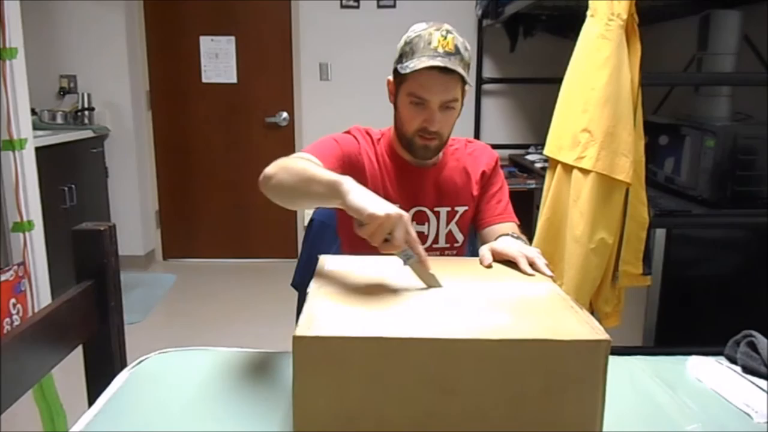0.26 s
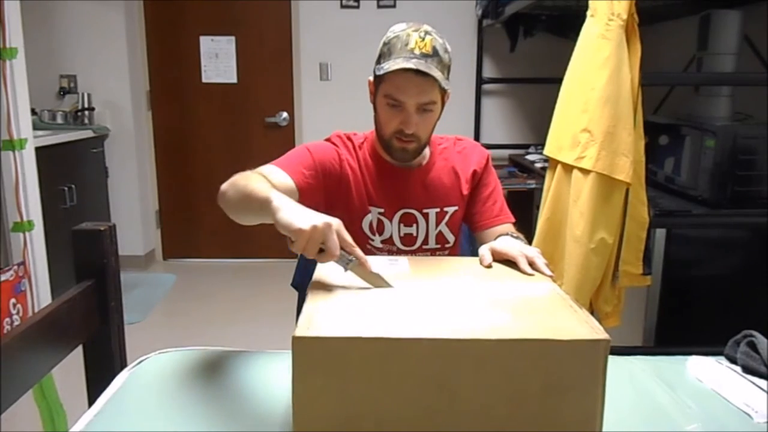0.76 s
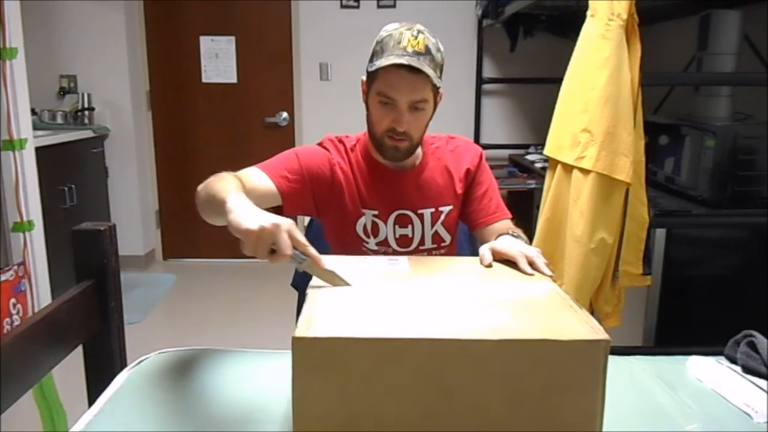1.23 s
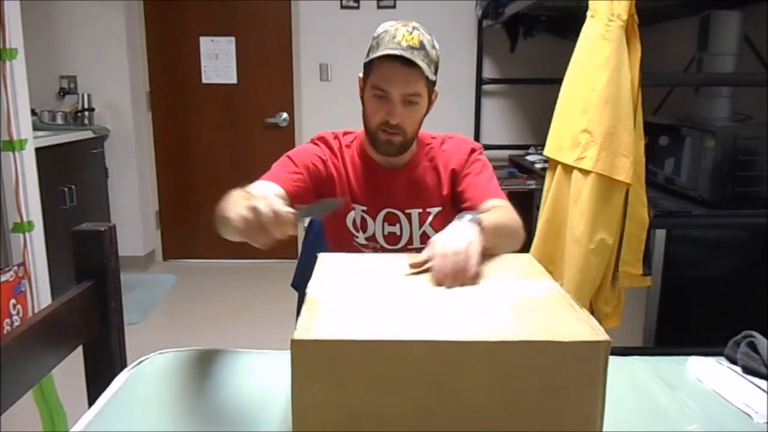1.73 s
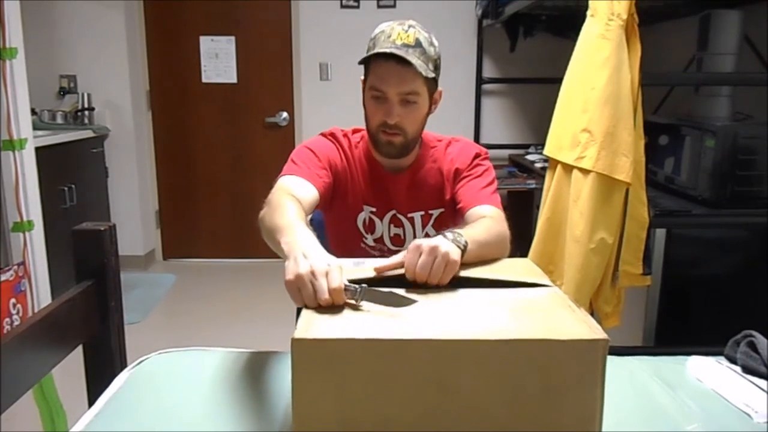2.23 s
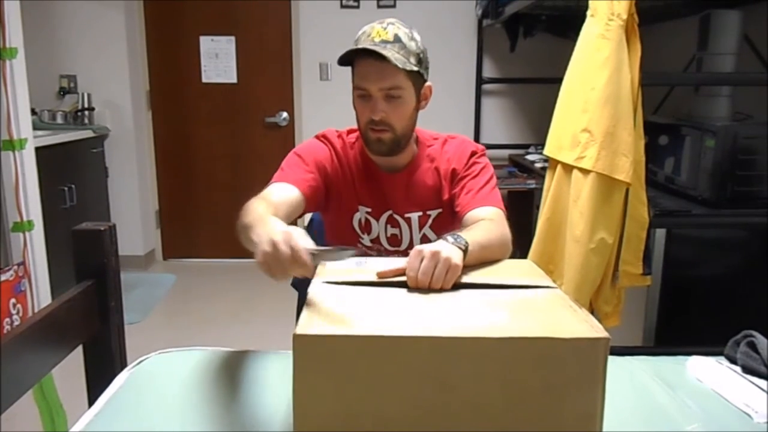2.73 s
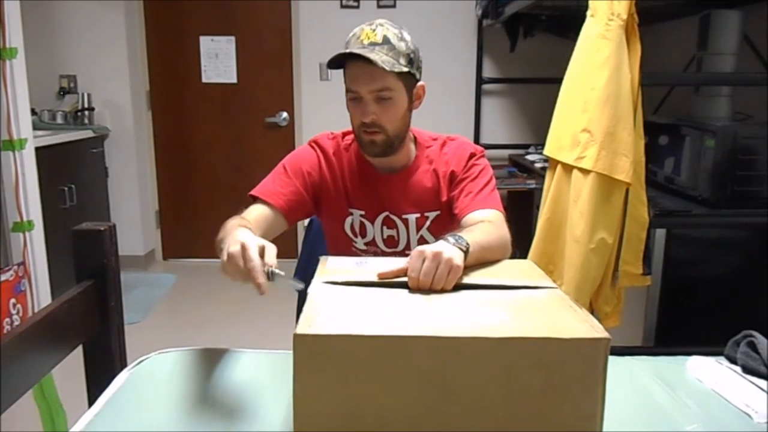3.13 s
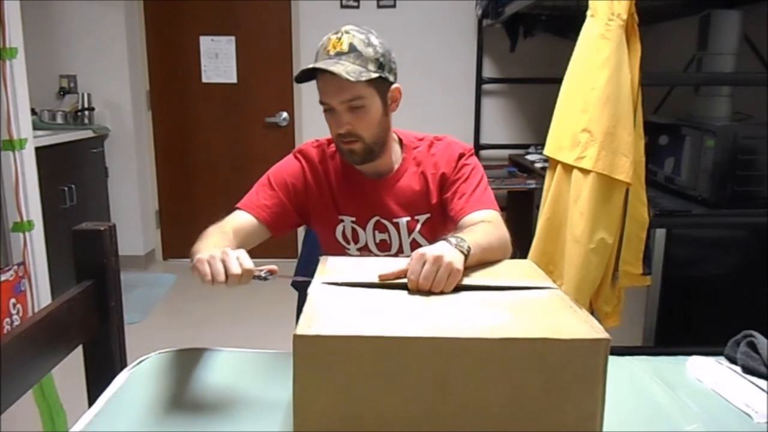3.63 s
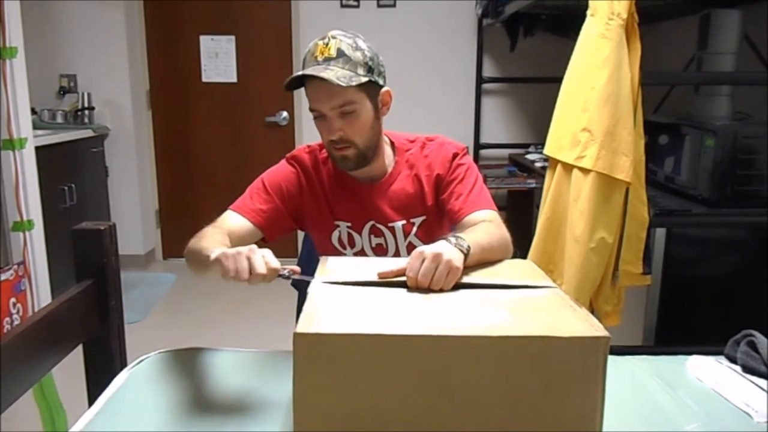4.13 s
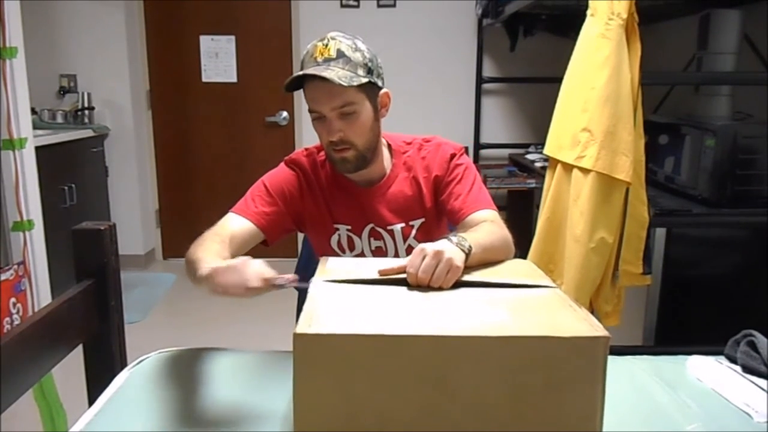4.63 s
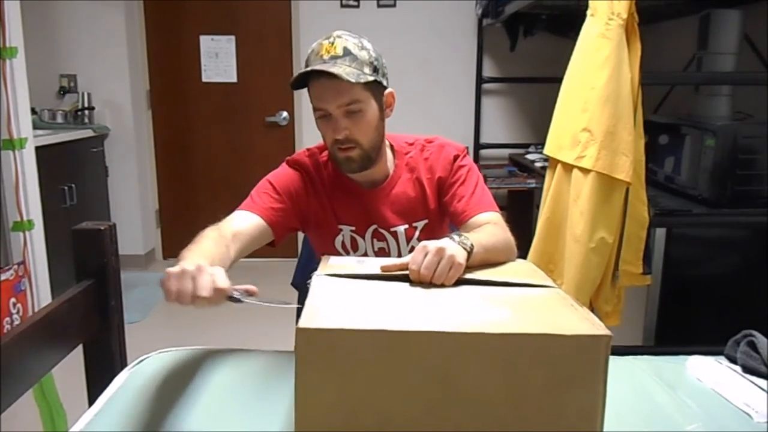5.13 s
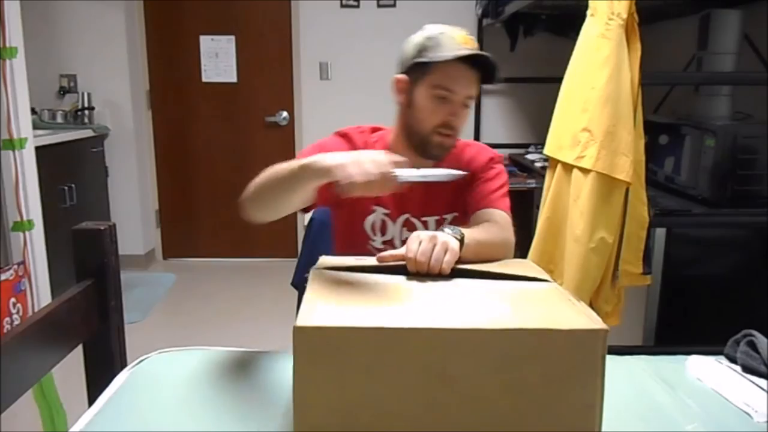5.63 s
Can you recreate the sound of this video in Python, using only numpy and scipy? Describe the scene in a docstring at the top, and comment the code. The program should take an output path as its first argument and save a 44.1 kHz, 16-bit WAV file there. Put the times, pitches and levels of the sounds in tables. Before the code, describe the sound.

Scratchy knife strokes slit packing tape on a cardboard box, broken by knocks, rips and flap clatter over steady ventilation noise.

```python
"""A knife slits the packing tape of a cardboard box on a table: the blade rasps in sticks and slips.
Taut tape snaps and rips in bursts of fractures; hands slide over the board and knock it.
Freed flaps clatter in quickening rebounds; the steel squeaks as it is pulled out of the seam.
Filtered noise makes the ventilation underneath; a small hard-walled room echoes all but that."""
import sys
import numpy as np
from scipy import signal
from scipy.fft import rfft, irfft
from scipy.io import wavfile
from scipy.ndimage import uniform_filter1d, map_coordinates

SR = 44100
rng = np.random.default_rng(int(sys.argv[2]) if len(sys.argv) > 2 else 0)


def digitize_waveform(pressure):
    """Quantize a signal to 16-bit integers and store it at the path in sys.argv[1].

    Rows of a 2-D input are taken as channels; values are limited to [-1, 1].
    """
    field = np.atleast_2d(pressure).T
    bounded = np.clip(field, -1, 1)
    quanta = np.round(bounded * 32767).astype(np.int16)
    wavfile.write(sys.argv[1], SR, quanta)


N = 258861
TIME = np.arange(N) / SR

# hands and flaps sliding on the box: peak t/s, length/s, relative board rasp/dB, relative tape hiss/dB
RUBS = [(1.895, 0.2, -26.5, -37.5), (2.035, 0.089, -28.5, -39), (2.125, 0.14, -30.5, -49),
        (2.225, 0.099, -31.5, -36.5), (2.315, 0.035, -21.5, -46), (2.44, 0.28, -43, -47.5),
        (2.64, 0.13, -40, -44.5), (4.76, 0.14, -26, -40), (4.975, 0.092, -36.5, -46),
        (5.032, .065, -27.5, -28)]
RUB_RISE = 0.45  # share of a rub spent speeding up
# resonances of the box panels: f/Hz, width/Hz, relative level/dB
PANEL_MODES = [(582.5, 41, 6), (963, 23, -3), (1164, 135, -5), (1265, 100, -1), (1590, 130, -0.5),
               (1944, 110, -2.5), (1950, 400, -0.5), (2310, 510, -1), (2810, 140, -12.5), (2775, 15, -29),
               (4450, 220, 5.5), (6060, 300, 3)]
# spectrum of a dull box thud: f/Hz, level/dB
THUD = [(40, -23), (90, -3), (130, 0.5), (190, 7.5), (300, 5.5), (600, -18.5), (2000, -41)]


def undb(db):
    """Decibels to gain."""
    return 10 ** (np.asarray(db) / 20)


def unit(x):
    """Scale to rms 1."""
    return x / np.sqrt(np.mean(x ** 2))


def sized(x, db):
    """Give a short sound the energy of 5 ms at this rms level."""
    return x * undb(db) * np.sqrt(0.005 * SR / np.sum(x ** 2))


def add(track, t_s, x):
    """Mix a sound into the track at its time."""
    i = int(t_s * SR)
    track[i:i + len(x)] += x[:N - i]


def through(x, response):
    """Convolve with an impulse response, keeping the length."""
    return signal.fftconvolve(x, response)[:len(x)]


def along(points, hz):
    """Interpolate (Hz, value) points on a log-frequency axis."""
    f, value = np.transpose(points)
    return np.interp(np.log(hz + 1), np.log(f), value)


def colour(points, size=2048):
    """Minimum-phase impulse response with this (Hz, dB) spectrum, by folding the cepstrum."""
    level_db = along(points, np.fft.rfftfreq(size, 1 / SR))
    cepstrum = irfft(np.log(undb(level_db)))
    cepstrum[1:size // 2] *= 2
    cepstrum[size // 2 + 1:] = 0
    return irfft(np.exp(rfft(cepstrum)))


def ring(modes, size=2048):
    """Impulse response of damped modes (Hz, width Hz, dB); bandwidth sets the decay."""
    t = TIME[:size]
    response = np.zeros(size)
    for hz, width_hz, db in modes:
        peak_scale = 2 * np.pi * width_hz / SR
        decay = np.exp(-np.pi * width_hz * t)
        response += undb(db) * peak_scale * decay * np.cos(2 * np.pi * hz * t)
    return response


def resonate(x, modes):
    """A sound together with its response through damped modes."""
    return x + through(x, ring(modes))


def hump(hz, below_db, above_db, count=3):
    """Spectrum with its corner at hz and a slope in dB per octave away from it on each side."""
    low = (hz / 2 ** count, below_db * count)
    high = (hz * 2 ** count, above_db * count)
    return colour([low, (hz, 0), high])


def walk(rate_hz, size=N):
    """Smooth random wandering through rate_hz knots per second, spread near 1."""
    knots = rng.standard_normal(4096)
    return map_coordinates(knots, [TIME[:size] * rate_hz], order=2, mode="wrap")


def gain_curve(rows, axis):
    """Gain from one dB column of a continuous cut, silent after it."""
    gain = np.interp(TIME, rows[:, 0], undb(rows[:, axis]), right=0)
    return uniform_filter1d(gain, size=256)


def swells(table, rise, axis):
    """Gain of separate strokes: each speeds up to its peak, then slows to a stop."""
    gain = np.zeros(N)
    for row in table:
        peak_s, length_s = row[:2]
        corners_s = [-rise * length_s, 0, (1 - rise) * length_s]
        gain += undb(row[axis]) * np.interp(TIME - peak_s, corners_s, [0, 1, 0])
    return gain


def slips(rate_hz, spread_db):
    """Tiny slips at random moments, uneven in strength and random in sign."""
    happen = rng.random(N) < rate_hz / SR
    size = undb(spread_db * np.minimum(rng.standard_normal(N), 2.5))
    return unit(happen * size * rng.choice([-1, 1], N))


def crush(ms, spread_db=4, size=8192):
    """Fibres giving way: tiny fractures of uneven strength, dying away with time constant ms."""
    uneven = undb(spread_db * np.tanh(walk(506, size=size)))
    return uneven * rng.standard_normal(size) * np.exp(-TIME[:size] * 1000 / ms)


def blow(db, hz, ring_db, bass_db, treble_db, ms, spot_width_hz=60):
    """A blow crushes a little board, rings the struck spot and then the panels."""
    # board spectrum: f/Hz, level/dB
    board = [(60, -46), (250, -13), (450, 2), (750, -2), (1100, 3.5), (1600, -2), (2500, -2), (4500, -5),
             (7000, -13.5), (10000, -30)]
    contact = through(crush(ms), hump(hz, bass_db, treble_db))
    spot = resonate(contact, [(hz, spot_width_hz, ring_db)])
    modes = [(mode_hz, width_hz, mode_db - 6.5) for mode_hz, width_hz, mode_db in PANEL_MODES]
    return sized(through(spot, resonate(colour(board), modes)), db)


def scraping(board_gain, tape_gain, flute_hz, catch_db, ring_db, travel_db):
    """An edge sticks and slips over the board, catching on its flutes; the tape film crackles."""
    # spectrum of board rasp: f/Hz, level/dB
    rasp_points = [(50, -46), (170, -22), (400, -7), (750, 0.5), (1250, 4), (2000, -0.5), (2900, 3),
                   (4000, -2), (5500, -12.5), (10000, -43)]
    # spectrum of tape hiss: f/Hz, level/dB
    hiss_points = [(1000, -42), (3000, 3.5), (4700, 1), (5800, 0), (7300, -1.5), (8800, -6), (10300, -18.5)]
    catching = unit(undb(catch_db * np.tanh(walk(flute_hz)) + walk(22.47)))
    board = through(slips(2000, spread_db=1), colour(rasp_points))
    # each mode swells and fades as the edge travels over its crests and nodes
    modes = np.zeros(N)
    for mode in PANEL_MODES:
        travel = undb(ring_db + travel_db * np.tanh(walk(12)))
        modes += travel * through(board, ring([mode]))
    rasp = unit(board + modes)
    hiss = unit(through(slips(5000, spread_db=6.5), colour(hiss_points)))
    return undb(-3.5) * catching * (rasp * board_gain + hiss * tape_gain)


def tears(table, below_db, above_db):
    """Taut tape parts in a burst of fractures coloured around one pitch."""
    out = np.zeros(N)
    # the narrow strip radiates little bass
    highpass = signal.butter(2, 380, "high", fs=SR, output="sos")
    for t_s, db, hz, ms in table:
        burst = through(crush(ms), hump(hz, below_db, above_db))
        add(out, t_s, sized(signal.sosfilt(highpass, burst), db))
    return out


def ventilation():
    """Steady air noise with a few faint, wavering duct resonances."""
    # air spectrum: f/Hz, level/dB
    vent = [(30, -12), (60, -22), (130, -10), (200, -14), (300, -4.5), (410, 1), (560, -4.5), (900, -3.5),
            (1350, -6.5), (1650, -13.5), (2900, -14), (3500, -18.5), (6500, -24.5), (10500, -43.5)]
    # duct resonances: f/Hz, width/Hz, relative level/dB
    duct_modes = [(414.4, 18, -3), (1078, 6.2, -18), (1411, 20, -12), (2880, 17, -15)]
    air = unit(through(rng.standard_normal(N), colour(vent)))
    duct = unit(through(rng.standard_normal(N), ring(duct_modes)))
    duct_gain = undb(-6.5 + 0.6 * walk(5.0))
    return undb(-48.5) * (undb(-1.5) * air + duct_gain * duct)


def box_body():
    """The hollow box thuds on the table and its panels rumble under the hands."""
    # thuds: t/s, level/dB
    bumps = [(0.052, -46.5), (1.786, -41.5), (1.926, -40.5), (2.027, -39.5), (2.259, -40.5), (4.177, -45),
             (4.589, -41), (4.645, -38.5), (4.954, -38.5), (4.981, -43.5), (5.586, -42), (5.614, -45)]
    out, thud = np.zeros(N), colour(THUD)
    for t_s, db in bumps:
        add(out, t_s, sized(through(crush(ms=13.6), thud), db))
    rumble = unit(through(slips(400, spread_db=4), thud))
    # rumble level is relative to the board column of the rubs
    return out + undb(-29.5) * rumble * swells(RUBS, RUB_RISE, axis=2)


def knocks():
    """Hands and knife bump the cardboard: single blows."""
    # t/s, level/dB, struck spot f/Hz, spot ring/dB, slope above the spot/(dB/octave), crush time/ms
    hits = [(1.064, -25.5, 1400, -10, -1, 5.1), (1.47, -26, 1200, 18, 2.5, 12),
            (1.786, -24, 1510, -1, 1.5, 28), (1.909, -24, 1310, -6, 2.5, 10),
            (1.921, -22, 1840, -7, -6, 3.1), (1.945, -26.5, 1460, -6, -15, 21),
            (2.263, -19, 542, 6, -1.5, 8.2), (2.305, -20.5, 2670, 8, -10, 13),
            (2.671, -21.5, 730, 16, 1.5, 30), (3.475, -34.5, 600, 9, -5, 17),
            (4.171, -35.5, 1510, -12, 3, 15), (5.006, -22, 810, 11, -4, 59), (5.040, -26, 1792, 22, -5, 11),
            (5.051, -24, 573, 7, -5.5, 41), (5.576, -35, 775, 22, -9, 27)]
    out = np.zeros(N)
    for t_s, db, hz, ring_db, treble_db, ms in hits:
        add(out, t_s, blow(db, hz, ring_db, -1.5, treble_db, ms))
    return out


def clatters(count=4):
    """A freed flap slaps the box and rebounds in a quickening, fading, duller run."""
    # first slap: t/s, level/dB, nominal spot f/Hz, spot ring/dB, slope above the spot/(dB/octave),
    # crush time/ms, first gap/ms
    slaps = [(2.256, -17.5, 1220, 15.5, 4.5, 4.4, 11), (4.640, -12, 986, 3.5, -0.5, 9.9, 16.3)]
    rebound_ratio, loss_db, dull_db_per_octave = 0.84, -2, -1  # per rebound; ratio of gap and crush time
    scatter_octaves = 0.16  # each slap lands on a slightly different spot
    out = np.zeros(N)
    for t_s, db, hz, ring_db, treble_db, ms, gap_ms in slaps:
        for k in range(count):
            shrink = rebound_ratio ** k
            spot_hz = hz * 2 ** (scatter_octaves * rng.standard_normal())
            slope_db = treble_db + k * dull_db_per_octave
            slap = blow(db + k * loss_db, spot_hz, ring_db, -3.5, slope_db, ms * shrink)
            add(out, t_s, slap)
            t_s = t_s + shrink * gap_ms / 1000
    return out


def handling():
    """Hands and flaps slide over board and tape in stick-slip rubs."""
    board, tape = swells(RUBS, RUB_RISE, axis=2), swells(RUBS, RUB_RISE, axis=3)
    return scraping(board, tape, flute_hz=139.4, catch_db=3.5, ring_db=-11.0, travel_db=22)


def squeaks(jitter=0.071, size=2048):
    """The blade sticks and slips almost regularly: short unsteady spurts, coloured around a few pitches."""
    # spurts: t/s, level/dB
    spurts = [(4.692, -20.5), (5.008, -27), (5.023, -23), (5.037, -24)]
    # partials: multiple of the slip rate, relative level/dB
    partials = [(1, -1.5), (2, 7), (3, -7), (4, -25)]
    # squeak colour: f/Hz, width/Hz, relative level/dB
    squeak_colour = [(1890, 150, 17), (4270, 110, 6), (6850, 42, 0)]
    slip_hz, spurt_ms = 2122, 9.2
    out = np.zeros(N)
    envelope = np.sin(np.pi * np.minimum(TIME[:size] * 1000 / spurt_ms, 1))
    for t_s, db in spurts:
        pitch_hz = slip_hz * (1 + jitter * walk(960, size=size))
        phase = 2 * np.pi * np.cumsum(pitch_hz) / SR
        tone = sum(undb(partial_db) * np.sin(k * phase) for k, partial_db in partials)
        add(out, t_s, sized(resonate(envelope * tone, squeak_colour), db))
    return out


def tape_snaps():
    """Tape snaps against the blade or the flaps; slack tape snaps lower and for longer."""
    # t/s, level/dB, snap f/Hz
    snap_rows = [(1.055, -22.5, 6360), (1.063, -23.5, 5330), (1.196, -25.5, 5050), (1.543, -34, 2820),
                 (1.556, -34.5, 2860), (1.862, -26.5, 6260), (1.866, -19, 6000), (1.878, -31, 6370),
                 (1.999, -22.5, 4870), (2.072, -37, 7600), (2.169, -25.5, 6100), (5.424, -43, 3500),
                 (5.459, -42.5, 3720), (5.497, -37, 3280), (5.53, -31.5, 3570)]
    ref_ms, ref_hz, slack_power = 2.4, 5600, 1.05
    timed = [(t_s, db, hz, ref_ms * (ref_hz / hz) ** slack_power) for t_s, db, hz in snap_rows]
    return tears(timed, below_db=-3.5, above_db=-14)


def seam_rips():
    """Short rips of the seam: longer, steeper-sided bursts of fractures."""
    # t/s, relative level/dB, rip f/Hz, decay time constant/ms
    rip_rows = [(1.425, -23, 3130, 110), (2.675, -16.5, 1700, 44), (2.699, -14.5, 2330, 21),
                (4.636, -17.5, 5800, 43)]
    return undb(-7.0) * tears(rip_rows, below_db=-8.5, above_db=-18.0)


def short_strokes():
    """Short strokes scrape the end of the lid seam, then the side seams, all slightly muffled."""
    # strokes: peak t/s, length/s, relative board rasp/dB, relative tape hiss/dB
    strokes = [(1.14, 0.15, -38.5, -42), (1.485, 0.063, -36, -41), (1.615, .13, -37.5, -38.5),
               (3.77, 0.28, -56, -51.5), (3.915, 0.28, -44.5, -48.5), (4.09, 0.15, -42.5, -46),
               (4.205, 0.16, -42, -51), (4.29, 0.091, -42.5, -60), (4.42, 0.24, -44.5, -45.5),
               (5.39, 0.28, -50.5, -57.5), (5.53, 0.17, -38.5, -43.5)]
    # muffling: f/Hz, level/dB
    muffle = [(400, 1.5), (1000, 0), (3300, -1.5), (4900, 1), (7000, -3), (10000, -3.5)]
    # faint stroke resonances: f/Hz, width/Hz, relative level/dB
    stroke_modes = [(2530, 110, -2), (4840, 220, -4.5)]
    rise = 0.47  # share of a stroke spent speeding up
    board, tape = swells(strokes, rise, axis=2), swells(strokes, rise, axis=3)
    scrape = scraping(board, tape, flute_hz=174, catch_db=0, ring_db=1.5, travel_db=5)
    return undb(-1.0) * resonate(through(scrape, colour(muffle)), stroke_modes)


def lid_cut():
    """One long pull of the blade along the lid seam, scraping board and tape."""
    # pull along the seam: t/s, relative board rasp/dB, relative tape hiss/dB
    pull = [(0.0, -26, -34), (0.168, -26.5, -36.5), (0.34, -32, -42), (0.37, -30.5, -37.5),
            (0.504, -37.5, -45), (0.588, -45, -41), (0.674, -27.5, -39), (0.756, -33, -40.5),
            (1.04, -35.5, -38)]
    # run-out to the corner: t/s, relative board rasp/dB, relative tape hiss/dB
    runout = [(1.22, -36.5, -40.5), (1.246, -34.5, -37), (1.446, -50, -60), (1.46, -41, -45)]
    rows = np.concatenate([pull, runout])
    board, tape = undb(1) * gain_curve(rows, axis=1), undb(1) * gain_curve(rows, axis=2)
    return scraping(board, tape, flute_hz=166.5, catch_db=2.0, ring_db=-9.5, travel_db=9)


def room(gap_s, dense_s, size=32768):
    """Unit-energy echo: sparse reflections crowd into a diffuse tail, each band decaying at its own rate."""
    # decay: f/Hz, t60/s
    room_t60 = [(150, 0.76), (500, 0.54), (1500, 0.5), (3500, 0.63), (6000, 0.56), (10000, 0.22)]
    t, hz = TIME[:size], np.fft.rfftfreq(size, 1 / SR)
    density = np.clip((t / dense_s) ** 2, 0.01, 1)
    echoes = (rng.random(size) < density) * rng.choice([-1, 1], size) / np.sqrt(density)
    spectrum, tail = rfft(echoes), np.zeros(size)
    # overlapping bands whose shares sum to 1
    for band, (_, t60_s) in zip(np.eye(len(room_t60)), room_t60):
        share = along([(f, weight) for (f, _), weight in zip(room_t60, band)], hz)
        tail += irfft(spectrum * share) * np.exp(-np.log(1000) * t / t60_s)
    tail = tail * np.clip(t / gap_s - 0.5, 0, 1)
    return tail / np.sqrt(np.sum(tail ** 2))


def scene():
    """All sources, each with its share of room echo; the blade squeaks and tape snaps are the most direct."""
    cutting = lid_cut() + short_strokes() + handling()
    blows = knocks() + clatters() + box_body()
    snaps, rips, blade = tape_snaps(), seam_rips(), squeaks()
    to_walls = undb(-3.5) * cutting + undb(-4.5) * blows
    to_walls += undb(-7.0) * snaps + undb(-4) * rips + undb(-9.5) * blade
    echo = through(to_walls, room(gap_s=0.0027, dense_s=0.12))
    direct = cutting + blows + snaps + rips + blade
    return (direct + echo + ventilation())[None]


def record(dry):
    """Round the highest peaks by soft saturation and cut off the top of the treble."""
    top_hz = 10300
    rounded = np.tanh(1.5 * dry) / 1.5
    lowpass = signal.ellip(8, 0.3, 65, top_hz, fs=SR, output="sos")
    return signal.sosfilt(lowpass, rounded)


dry = scene()
out = record(dry)
digitize_waveform(out)
```